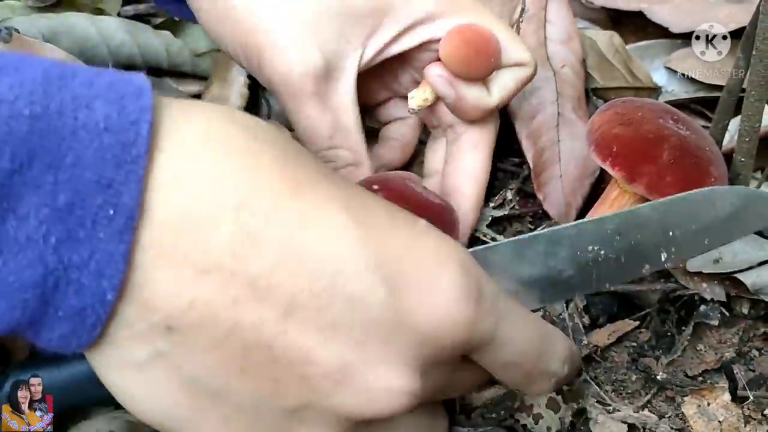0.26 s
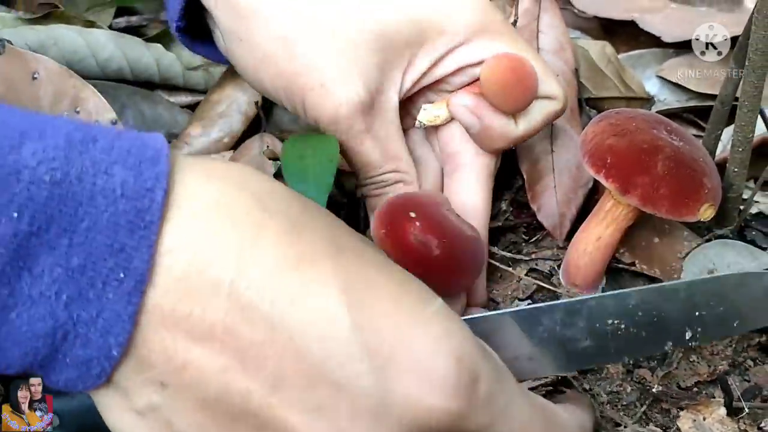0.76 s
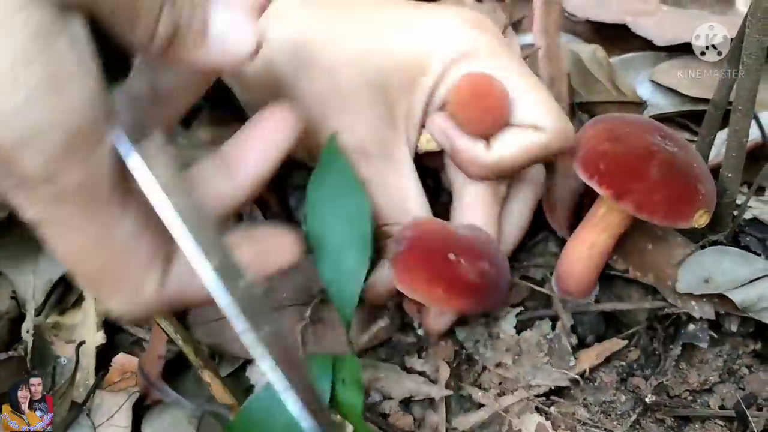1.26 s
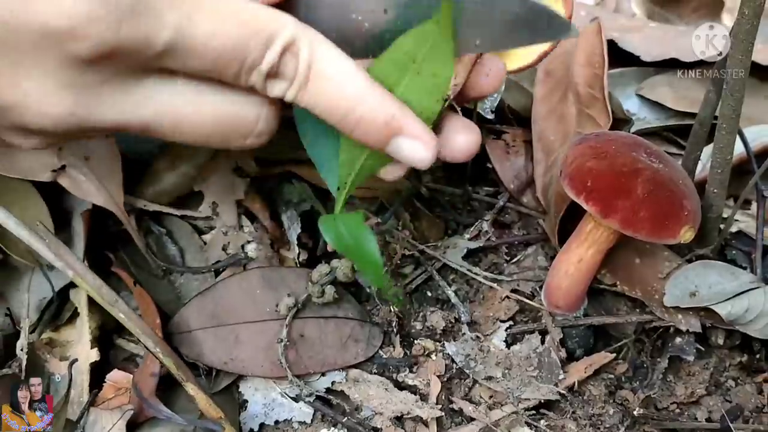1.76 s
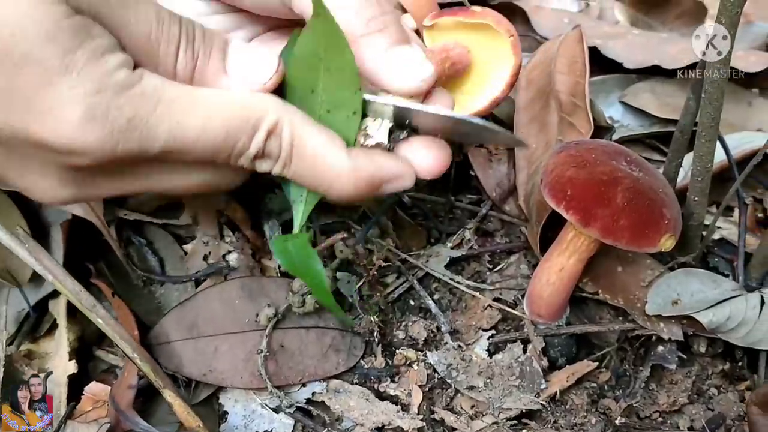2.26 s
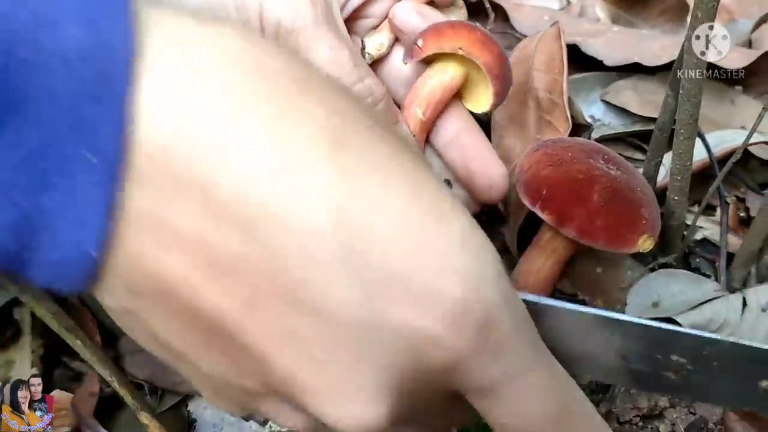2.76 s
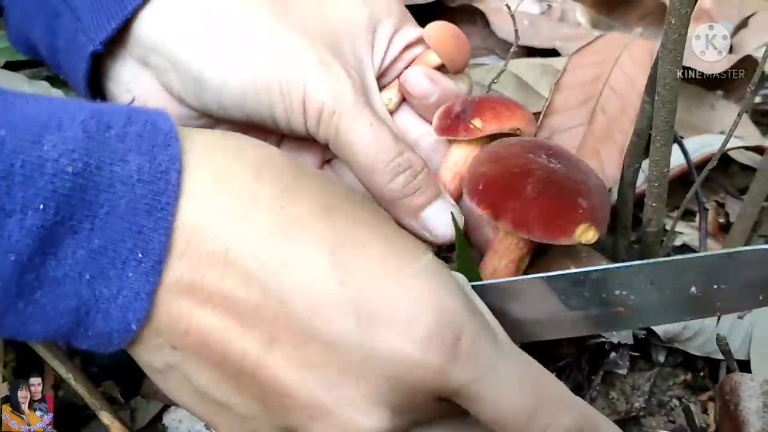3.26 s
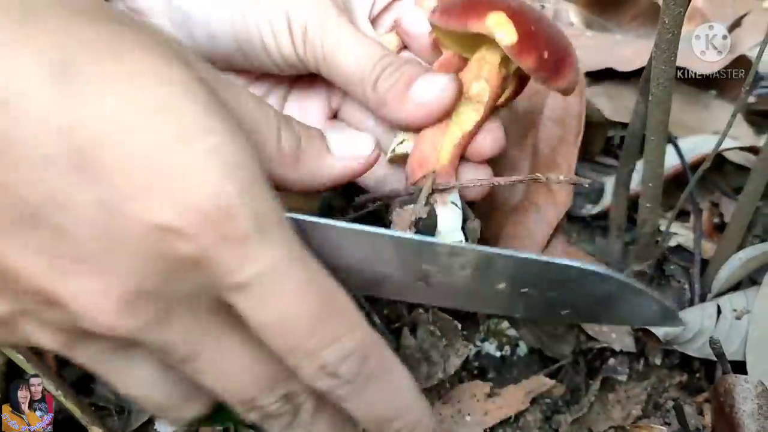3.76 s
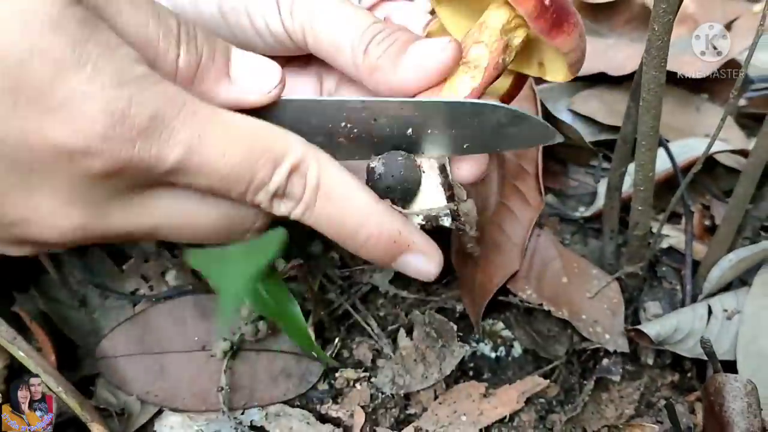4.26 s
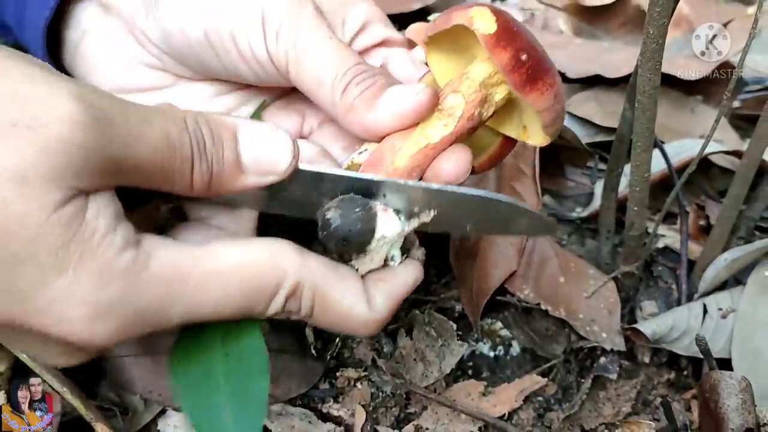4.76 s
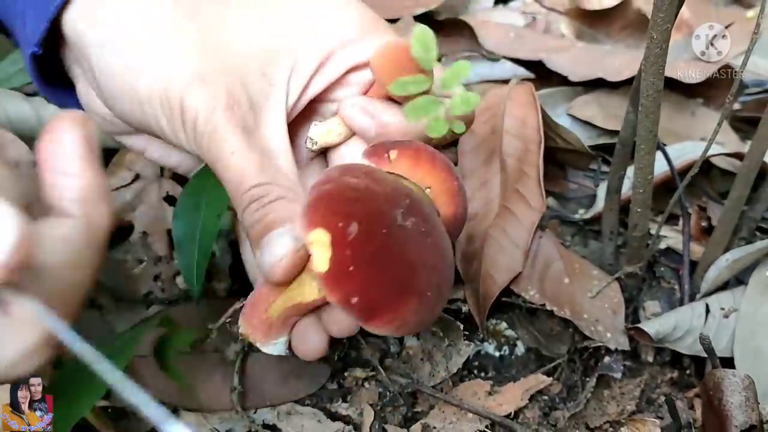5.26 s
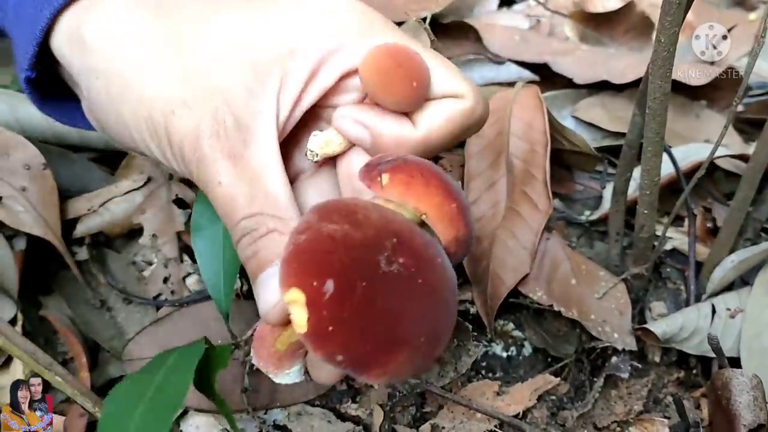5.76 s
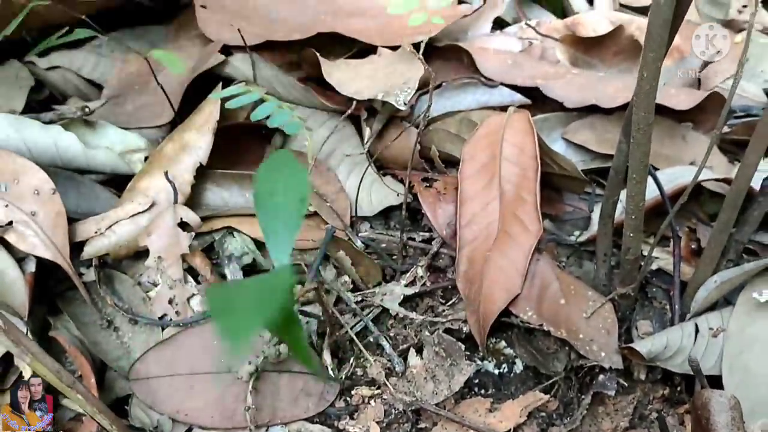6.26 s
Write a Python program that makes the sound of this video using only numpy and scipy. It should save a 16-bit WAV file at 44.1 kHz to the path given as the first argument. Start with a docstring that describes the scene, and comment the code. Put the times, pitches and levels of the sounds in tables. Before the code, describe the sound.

Close, crackly leaf-litter rustling and brittle snaps as mushrooms are picked and trimmed, with quiet woodland hiss and a short bird whistle behind.

```python
"""On a forest floor, microphones close to the ground: hands pick mushrooms from dry leaf litter, a knife scrapes stems.
Leaves and grit crackle as bands of noise struck by countless random grains, over soft rubbing.
Leaf ribs and twigs snap as short runs of fractures; twice a flicked leaf rings with damped sine modes.
A bird whistles one phrase on the right and others call farther off, all gliding sines with scattered echoes.
Filtered noise makes the hiss of insects in the trees and the far sounds of the wood."""
import sys
import numpy as np
from scipy import signal
from scipy.io import wavfile

SR = 44100
rng = np.random.default_rng(int(sys.argv[2]) if len(sys.argv) > 2 else 0)


def int16_out(signal):
    """Quantize to a 16-bit WAV file."""
    q = np.round(np.clip(np.atleast_2d(signal).T, -1, 1) * 32767)
    wavfile.write(sys.argv[1], SR, q.astype(np.int16))


N = 286650
TIME = np.arange(N) / SR


def from_db(db):
    """Decibels to gain."""
    return 10 ** (np.asarray(db) / 20)


def rms_one(x):
    """Scale to an rms of 1."""
    return x / np.sqrt(np.mean(x ** 2) + 1e-20)


def at_hz(points, hz):
    """Read a table on a log-frequency axis."""
    freq, value = np.transpose(points)
    return np.interp(np.log(hz), np.log(freq), value)


def band(x, low_hz, high_hz, order=2):
    """Causal band-pass."""
    edges = [low_hz, min(high_hz, .45 * SR)]
    return signal.sosfilt(signal.butter(order, edges, "band", fs=SR, output="sos"), x + 1e-18)


def ring(x, hz, width_hz):
    """One resonance, gain 1 on top."""
    r = np.exp(-np.pi * width_hz / SR)
    feedback = [1, -2 * r * np.cos(2 * np.pi * hz / SR), r * r]
    return signal.lfilter((1 - r * r) / 2 * np.array([1, 0, -1]), feedback, x + 1e-18)


def drift(rate):
    """Straight lines between random values of spread 1, that many values a second."""
    return np.interp(TIME * rate, np.arange(4096), rng.standard_normal(4096))


def pair(size, likeness):
    """Left and right white noise with a given likeness (correlation)."""
    mid, side = rng.standard_normal((2, size))
    likeness = np.clip(likeness, -1, 1)
    return (np.sqrt(1 + likeness) * mid + np.sqrt(1 - likeness) * side * [[1], [-1]]) / np.sqrt(2)


def pan(balance_db):
    """Left and right gains at constant power; a positive balance is louder on the left."""
    return rms_one(from_db([[balance_db / 2], [-balance_db / 2]]))


def scatter(x, t60, gap_s):
    """Dense reflections swell in and die, unrelated in the two channels, at the power of the source."""
    t = TIME[:SR]
    tail = rng.standard_normal((2, SR)) * from_db(-60 * t / t60) * (1 - np.exp(-t / gap_s))
    return signal.fftconvolve(x, rms_one(tail) / np.sqrt(SR), axes=1)[:, :N]


def lag_right(x, lag_s):
    """Sound from the hands reaches the left microphone first."""
    return np.stack([x[0], np.interp(TIME - lag_s, TIME, x[1])])


# colour of the far wood, relative: (frequency [Hz], density [dB per Hz])
FOREST_COLOUR = [(28, 10), (55, 4), (105, -6), (180, 4), (300, -13.5), (520, -14), (1300, -10), (2100, -2),
                 (3100, -6), (3700, -2), (5600, -6), (6800, -16), (8000, -20.5), (12000, -16), (15500, -45)]
# how alike the far wood is at both microphones: (frequency [Hz], left-right correlation)
FOREST_LIKENESS = [(50, 0.14), (130, 0.5), (600, 0.44), (1400, 0.0035), (3000, -0.16)]
FOREST_DB = -59


def forest(low_pan_db=0.0, high_pan_db=-5.0):
    """Low rumble of air and a wash of distant calls: bands of noise, each wavering by itself."""
    edges, out = np.geomspace(20, 16000, 23), 0
    patchy_db = 1.3
    balance = [(400, low_pan_db), (2400, high_pan_db), (5000, high_pan_db), (10000, low_pan_db)]
    for lo, hi in zip(edges, edges[1:]):
        hz = np.sqrt(lo * hi)
        waver_db = patchy_db * drift(4.0)
        gain = from_db(at_hz(FOREST_COLOUR, hz) + waver_db) * pan(at_hz(balance, hz))
        out = out + gain * band(pair(N, at_hz(FOREST_LIKENESS, hz)), lo, hi, order=3)
    return from_db(FOREST_DB) * rms_one(out)


INSECT_DB, INSECT_HZ, INSECT_WIDTH_HZ = -54, 4487, 740


def insects(side_db=-2.5, shimmer_db=1.0, shimmer_per_s=90):
    """Many far insects blend into one narrow, shimmering hiss of band-passed noise."""
    half_hz = INSECT_WIDTH_HZ / 2
    hiss = band(pair(N, 0), INSECT_HZ - half_hz, INSECT_HZ + half_hz, order=3)
    return from_db(INSECT_DB + shimmer_db * drift(shimmer_per_s)) * rms_one(hiss) * pan(side_db)


# soft body and fine fizz relative to the crackle, before hardness [dB]
BODY_DB, FIZZ_DB = -8.5, -17.5


def zone_gains(level_db, hard_db):
    """Gains of crackle, soft body and fizz for one contact; a harder one has less body and more fizz."""
    return from_db(level_db) * from_db([[0], [BODY_DB - hard_db / 2], [FIZZ_DB + hard_db]])


# the hands never rest entirely: (time [s], crackle level [dB])
FIDGET = [(0, -50), (1.6, -60.5), (2.1, -54.5), (2.8, -48.5), (3.6, -46), (4.15, -71), (4.28, -84),
          (4.65, -69), (4.8, -61), (5.8, -56), (6.2, -53.5), (6.5, -54)]
# fingertips only graze the litter, so their fidgeting is harder by this much [dB]
FIDGET_HARDNESS_DB = 4
# sweeps of hand and blade through the litter:
# (start [s], length [s], crackle level [dB], hardness [dB], release to 1/e [s])
SWEEPS = [(0.005, 0.027, -40.5, 8, 0.044), (0.208, 0.049, -46, 4, 0.032), (0.286, 0.038, -43, 8, 0.072),
          (0.409, 0.13, -45, 0, 0.03), (0.62, 0.14, -50, -2.5, .03), (0.808, 0.095, -45, 3.5, 0.032),
          (0.953, 0.032, -44.5, 0, .025), (1.035, 0.018, -34, 9, .075), (1.12, 0.055, -39.5, 4, 0.042),
          (1.258, 0.17, -47, -4, 0.043), (1.408, 0.099, -37.5, 6, 0.043), (1.512, 0.074, -40, 3, .045),
          (2.396, 0.12, -45, 7, .04), (2.47, 0.013, -37, -4, 0.048), (2.52, 0.22, -49, 3, 0.065),
          (2.76, 0.15, -49, 5, .05), (2.94, 0.055, -45, 9.5, 0.027), (3.108, 0.096, -44.5, 4, 0.032),
          (3.23, 0.057, -42, 2, 0.05), (3.48, 0.065, -45.5, 2, .04), (3.707, 0.26, -43, 2.5, 0.054),
          (3.842, 0.088, -42.5, 8.5, 0.031), (4.015, 0.077, -41, 3.5, 0.043), (5.154, 0.12, -43, 2.5, .05),
          (5.276, 0.058, -42, 0.5, 0.044), (5.382, 0.025, -33, 5.5, 0.018), (5.44, 0.11, -43.5, 6, 0.053),
          (5.571, 0.056, -40, 7, .016), (6.085, 0.022, -47.5, 12, 0.042)]
# light scrapes of the blade along a stem: (start [s], length [s], crackle level [dB])
SCRAPES = [(1.704, 0.056, -49), (1.837, 0.092, -51), (2.198, 0.11, -52.5), (4.334, 0.034, -50.5),
           (4.714, 0.0085, -50), (4.834, 0.04, -63), (4.961, 0.055, -55), (5.852, 0.0087, -61)]
SCRAPE_HARDNESS_DB, SCRAPE_RELEASE_S = 6, 0.054
# the swell is centred on the start; disturbed leaves settle from a lower level, in a multiple of the release
ATTACK_S, SETTLE_DB, SETTLE_RELEASES = 0.029, -5.5, 2.7


def handling():
    """Strokes swell, hold, let go and settle; their gains add in power over the fidgeting of the hands."""
    power = zone_gains(np.interp(TIME, *np.transpose(FIDGET)), FIDGET_HARDNESS_DB) ** 2
    scrapes = [(*row, SCRAPE_HARDNESS_DB, SCRAPE_RELEASE_S) for row in SCRAPES]
    for start, length, level_db, hard_db, release in SWEEPS + scrapes:
        swell = np.clip((TIME - start) / ATTACK_S + .5, 0, 1)
        after = np.maximum(TIME - start - length, 0)
        let_go = np.exp(-after / release)
        settle = from_db(SETTLE_DB) * np.exp(-after / (SETTLE_RELEASES * release))
        power += (zone_gains(level_db, hard_db) * swell * np.maximum(let_go, settle)) ** 2
    return np.sqrt(power)


# sound from the back of a leaf comes round its edge late and inverted:
# delay [s], swing of the delay (share), mean strength (share), random turns of the leaf [per s]
BACK_S, BACK_SWING, BACK_SHARE, TURNS_PER_S = .00066, .1, .42, 14


def both_faces(x):
    """Front and back of a leaf interfere; the hollows in its sound shift as the leaf turns."""
    late = TIME - BACK_S * (1 + BACK_SWING * drift(TURNS_PER_S))
    share = np.clip(BACK_SHARE * (1 + .5 * drift(TURNS_PER_S)), 0, 1)
    return x - share * np.stack([np.interp(late, TIME, channel) for channel in x])


# leaf or grit in the hands; broad leaves are darker and ring lower:
# (time [s], tilt of the crackle [dB per octave], resonance [Hz])
HANDLED = [(0, 0, 4370), (1.05, -4, 3440), (1.25, 0, 4080), (1.46, 2, 3560), (1.56, 0.5, 4000),
           (2.0, -1.5, 4260), (2.8, -3.5, 3260), (3.0, -2.5, 4050), (3.25, -1, 3600), (3.75, -2, 4000),
           (3.9, 2.5, 3800), (4.05, -2, 3100), (4.9, 2, 4000), (5.25, -4.5, 3330), (5.48, 1.5, 2450),
           (5.63, -4, 2880), (6.1, -5, 4200)]
# height [dB] and width [octaves] of that resonance
LEAF_PEAK_DB, LEAF_PEAK_OCTAVES = 1.5, 0.51
# colour of the litter, relative within each zone: (frequency [Hz], density [dB per Hz])
LITTER_COLOUR = [(90, -24), (190, -9.5), (380, -2.5), (520, -9), (750, -2), (1150, -1.5), (1480, -3.5),
                 (2100, -1), (2500, -1), (2950, -1.5), (3800, 2), (5500, 2.5), (6400, -4.5), (7500, -16.5),
                 (11000, -19.5), (15000, -25)]
# balance of the rustle: (frequency [Hz], left-right level [dB])
LITTER_PAN = [(200, 5), (400, 2.5), (800, -0.5), (2400, 0), (4400, -3), (8000, -1), (14000, 0.5)]
# the bass of the rustle is most alike at both microphones: (frequency [Hz], left-right correlation)
LITTER_LIKENESS = [(500, 0.71), (1150, 0.3), (3300, 0.18), (10000, 0.11)]
# fractures at rms handling [per s], spread of their sizes [dB], rubbing against grains of rms 1,
# change of colour from leaf to leaf [dB]
GRAINS_PER_S, GRAIN_SIZE_DB, RUB, PATCHY_DB = 1700, 2.7, .55, 3.8


def rustle(crackle, body, fizz, clump_db=1.0, clumps_per_s=150, patches_per_s=80):
    """Tiny fractures clump over a smooth rubbing; firmer handling breaks more, and colour shifts by leaf."""
    s, tilts, resonances = np.transpose(HANDLED)
    tilt, leaf_hz = np.interp(TIME, s, tilts), np.interp(TIME, s, resonances)
    density = GRAINS_PER_S * np.sqrt(rms_one(crackle))
    born = rng.random(N) < density / SR
    sizes = from_db(GRAIN_SIZE_DB * np.minimum(rng.exponential(1, N), 4))
    fractures = rms_one(born * sizes / np.sqrt(density))
    grains = (fractures + RUB) * from_db(clump_db * drift(clumps_per_s))
    out = np.zeros((2, N))
    # (low [Hz], high [Hz], bands, gain, tilt [dB per octave], heard from both faces of the leaf)
    zones = [(80, 1600, 9, body, 0, False),
             (1600, 7000, 12, crackle, tilt, True),
             (7000, 15700, 6, fizz, 0, True)]
    for low, high, count, gain, slope, two_faced in zones:
        edges, centre = np.geomspace(low, high, count + 1), np.sqrt(low * high)
        # neighbouring bands are struck unalike
        strikes = [grains * pair(N, at_hz(LITTER_LIKENESS, centre)) for _ in range(2)]
        zone = 0
        for k, (lo, hi) in enumerate(zip(edges, edges[1:])):
            hz = np.sqrt(lo * hi)
            colour_db = at_hz(LITTER_COLOUR, hz) + slope * np.log2(hz / centre)
            colour_db = colour_db + PATCHY_DB * drift(patches_per_s)
            colour_db += LEAF_PEAK_DB * np.exp(-(np.log2(hz / leaf_hz) / LEAF_PEAK_OCTAVES) ** 2)
            struck = band(strikes[k % 2], lo, hi)
            zone = zone + struck * from_db(colour_db) * pan(at_hz(LITTER_PAN, hz))
        out += gain * rms_one(both_faces(zone) if two_faced else zone)
    return out


# loud snaps of leaf ribs and twigs, and at 2.884 s a faint echo of the snap just before it; # the level is the
# rms over 10 ms from which each part is set: # (time [s], level [dB], resonance [Hz], decay to 1/e [s], body
# [dB re level], fizz [dB re level], # left-right level [dB])
SNAPS = [(.0099, -38, 4840, 0.0019, -34, -22, -0.5), (.2494, -38.5, 4700, 0.0013, -18, -13, -0.5),
         (.284, -44, 4200, 0.00091, -8, -2, 0.5), (.2895, -37, 4200, 0.0035, -8, -14, -3),
         (.3675, -33, 3500, 0.0017, -19, -17, 0.5), (.374, -32.5, 3630, 0.0021, -8.5, -12, -2),
         (.4429, -29, 4040, 0.0007, -26, -16, 2.5), (.4601, -30.5, 3700, 0.00046, -14, -20, -1.5),
         (.463, -35.5, 3500, 0.0028, -7, -14, -0.5), (.614, -44.5, 4130, 0.00089, 1.5, -10, -3),
         (.6595, -35.5, 4640, 0.0021, -7.5, -20, -3.5), (.706, -48, 5470, 0.00064, -10, -10, -2),
         (.7371, -32.5, 4150, 0.0018, -11, -19, -2), (.79, -30.5, 3980, 0.0019, -24, -31, -4),
         (.846, -34, 3340, 0.0058, -15.5, -9, -5), (.858, -38, 3320, 0.0022, -22, -19, 3),
         (.8927, -28.5, 3950, .0012, -29, -25, -2.5), (.959, -35.5, 4250, .003, -6.5, -19, -1),
         (.975, -39.5, 4070, 0.0021, -31, -13, -0.5), (1.0045, -36.5, 3660, 0.0013, -27, -7, -1),
         (1.013, -35, 3730, 0.0019, -20, -24, -2), (1.0325, -26.5, 3300, 0.00044, -7, -8, -0.5),
         (1.0415, -35, 4500, .0015, -26, -10, -0.5), (1.051, -41, 3700, 0.0012, -26, -13, 2),
         (1.055, -47, 3900, .0006, -22, -5, -1), (1.0655, -44, 3560, 0.0027, -24, -20, -9),
         (1.128, -39, 3900, 0.0015, -17, -20, -3), (1.1567, -34, 4830, 0.0019, -14, -8.5, 0),
         (1.166, -45, 3600, 0.0011, -5, -11, -3), (1.26, -37, 4930, 0.0036, -18, -20, -1),
         (1.279, -44.5, 3930, .0025, 1, -20, -0.5), (1.399, -35, 4460, 0.0026, -24, -18, -4.5),
         (1.356, -32.5, 5140, 0.014, -16, -19, -1), (1.4112, -29, 2500, 0.0012, -9.5, -16, -3.5),
         (1.4211, -26.5, 4100, 0.0015, -11.5, -20, -4.5), (1.438, -39, 4200, .001, -27, -16, -5.5),
         (1.4425, -37, 3500, 0.0017, -18, -20, -1.5), (1.459, -34, 2600, 0.0015, -23, -20, 0),
         (1.463, -30.5, 3670, 0.0018, -17, -21, -2), (1.4765, -38.5, 3700, .0016, -12, -27, -5.5),
         (1.4735, -33.5, 2400, 0.0051, -23, -14, -4.5), (1.487, -32, 3740, .0022, -15, -26, -2),
         (1.5215, -40, 5260, 0.0014, -6, -22, -4), (1.557, -32, 4150, .003, -18, -27, -0.5),
         (1.566, -36, 4400, 0.0012, -17, -26, -2.5), (1.574, -37, 5200, 0.00082, -13, -22, -1.5),
         (1.592, -32.5, 4000, 0.00061, -8, -16, 2.5), (1.6026, -26.5, 4130, 0.0011, -9.5, -13, -1),
         (1.6665, -34, 4600, .0016, -14.5, -13.5, -1), (1.9214, -39.5, 5500, 0.0018, -22, -29, 0),
         (1.997, -34.5, 4170, 0.00062, -23, -17.5, -4.5), (2.0415, -34, 3800, 0.002, -15, -18, -1),
         (2.197, -33, 4100, 0.00089, -35, -15, -5.5), (2.2025, -33, 4500, 0.002, -12, -14, -3.5),
         (2.3038, -35, 4340, 0.00087, -17, -9, 1), (2.3383, -42, 4630, 0.00064, -41, -14, -3),
         (2.3987, -35, 5800, .0033, -39, -22, -1.5), (2.4665, -17.5, 3770, 0.002, -17, -14.5, -1.5),
         (2.4705, -27.5, 3870, 0.0083, -13, -30, -2), (2.4775, -19.5, 5440, 0.0056, -23, -30, -1.5),
         (2.486, -23.5, 3900, 0.0031, -26, -27, 1), (2.8703, -25, 5170, 0.00051, -16, -39, -4.5),
         (2.884, -55, 5540, .0012, -12, -10, 3), (2.945, -52, 4760, 0.0012, -26, -13, -5),
         (2.987, -43.5, 4600, 0.0019, -23, -16, -4), (3.106, -28, 5020, 0.00077, -44, -20, -2.5),
         (3.2066, -34, 3800, 0.0015, -10.5, -34, -4), (3.2325, -37, 3870, 0.0011, -15, -22, -3),
         (3.278, -34, 4240, 0.0031, -22, -27, -2.5), (3.2915, -38, 3520, 0.0014, -12, -30, -1.5),
         (3.37, -43, 4200, .001, -20, -28, -1.5), (3.411, -43.5, 2770, 0.0012, 1, -31, 0.5),
         (3.4779, -35.5, 3720, 0.0027, -8.5, -38, -3.5), (3.4888, -30.5, 3160, 0.00096, -12, -30, -5),
         (3.5193, -20, 3750, 0.0017, -16, -21, -2.5), (3.545, -32.5, 3760, 0.0015, -23, -15, 1.5),
         (3.6159, -35, 5000, 0.0011, -28, -23, -6), (3.6944, -37, 4080, 0.001, -21, -30, -3),
         (3.849, -46.5, 3930, 0.0049, 8, -9, -3.5), (3.9058, -32.5, 4200, 0.0013, -10, -16, -1),
         (3.9105, -40, 4160, .0008, -16, -18, -1), (3.942, -37, 3550, 0.0024, -10, -26, 0),
         (4.049, -42.5, 4100, 0.0014, -11, -7, -4.5), (4.109, -52, 3600, .0008, -3, -19, -4),
         (4.1136, -41, 5440, 0.00077, -12, -16, 0), (4.365, -43, 4470, 0.0029, -7, -39, 3),
         (4.8891, -42.5, 3900, 0.003, -18, -20, 2), (4.9756, -39, 3800, 0.0026, -23, -15, -2),
         (5.1159, -40.5, 4360, 0.00058, -16, -15, -1.5), (5.2235, -36.5, 4040, 0.0021, -22, -11.5, -5),
         (5.286, -39.5, 3970, .005, -16, -13, -5), (5.2969, -39, 3680, 0.0023, 0, -12, -3),
         (5.406, -27, 3380, 0.0016, -22.5, -34, -8), (5.415, -36, 2820, 0.0041, -15, -23, -2.5),
         (5.4472, -36, 2600, 0.0034, -12, -7, -4.5), (5.493, -41, 2680, 0.0016, -9, -13, -3),
         (5.575, -24.5, 5930, 0.0017, -14, -13.5, -2), (5.5793, -24.5, 2150, 0.0028, -15.5, -17, -2),
         (5.61, -37, 3780, 0.0014, -23, -23, 0.5), (5.635, -42, 3970, 0.0022, -26, -21, -1.5),
         (5.6774, -39, 3300, 0.0005, -31, -31, -2.5), (5.6795, -42.5, 2340, 0.0008, -30, -33, -9),
         (5.6948, -29, 2800, 0.00061, -16, -44, -2.5), (5.854, -42.5, 5450, 0.0017, -20, -14, -2.5)]
# the crack spreads below and above the resonance of the broken piece (frequency ratios)
CRACK_BELOW, CRACK_ABOVE = 0.52, 1.415
# bands of a snap's body and fizz: (low [Hz], high [Hz])
BODY_HZ, FIZZ_HZ = (362, 1580), (5600, 12950)
# the soft ground takes the push of each snap: band (low [Hz], high [Hz]), level [dB re body]
THUD_HZ, THUD_DB = (84, 327), -13
# the farther right a snap lies, the sooner it reaches the right microphone;
# at the middle balance it has no lag within the snap layer
SNAP_LAG_S_PER_DB, SNAP_MIDDLE_DB = .00006, -3


def snaps(rows, likeness=0.43, crack_db=-7.5, ring_db=-10.0, ring_width_hz=430, body_pan_db=4.0,
          fizz_pan_db=-1.0, ragged_db=4.0, body_likeness=0.94, break_db=9.5):
    """A run of fractures swells to one clean break and dies away; the broken piece rings briefly."""
    size, lead = 2048, 256
    t, out = TIME[:size] - lead / SR, np.zeros((2, N + 2 * size))
    ten_ms = SR / 100
    clean_break = from_db(break_db) * signal.unit_impulse(size, lead)
    for s, level_db, hz, decay, body_rel, fizz_rel, side_db in rows:
        swell = np.exp(-np.abs(t) / decay)
        fractures = swell * from_db(ragged_db * rng.standard_normal(size))
        run = clean_break + fractures * pair(size, likeness)
        push = clean_break + fractures * pair(size, body_likeness)
        lag = round(SR * SNAP_LAG_S_PER_DB * (side_db - SNAP_MIDDLE_DB))
        run[1], push[1] = np.roll(run[1], lag), np.roll(push[1], lag)
        crack = band(run, CRACK_BELOW * hz, CRACK_ABOVE * hz, order=3)
        fine = band(fractures * pair(size, likeness), *FIZZ_HZ, order=3)
        # (sound, level [dB], shift of the balance [dB])
        parts = [(crack, crack_db, 0),
                 (ring(crack, hz, ring_width_hz), ring_db, 0),
                 (band(push, *BODY_HZ), body_rel, body_pan_db),
                 (band(push, *THUD_HZ), body_rel + THUD_DB, body_pan_db),
                 (fine, fizz_rel, fizz_pan_db)]
        start = round(s * SR)
        for part, part_db, shift_db in parts:
            even = part * np.sqrt(ten_ms / np.sum(part ** 2, axis=1, keepdims=True))
            out[:, start:start + size] += even * from_db(level_db + part_db) * pan(side_db + shift_db)
    return out[:, lead:lead + N]


# random ticks of grit: rate [per s], level [dB re crackle], spread [dB]
TICKS_PER_S, TICK_DB, TICK_SPREAD_DB = 16, -4.5, 2.2
# middle resonance, and the remaining columns of a snap
TICK_HZ, TICK_DECAY_S, TICK_BODY_DB, TICK_FIZZ_DB, TICK_PAN_DB = 4200, 0.00093, -24, -28, 0.5


def grit_ticks(crackle):
    """Crumbs of grit give small snaps at random, their level following the handling of the moment."""
    slot_s = .02
    slots = np.arange(0, N / SR, slot_s)
    chance, late = rng.random((2, len(slots)))
    size, pitch = rng.standard_normal((2, len(slots)))
    s = slots + late * slot_s
    level_db = 20 * np.log10(np.interp(s, TIME, crackle)) + TICK_DB + TICK_SPREAD_DB * size
    hz = TICK_HZ * 2 ** (.2 * pitch)
    shape = (TICK_DECAY_S, TICK_BODY_DB, TICK_FIZZ_DB, TICK_PAN_DB)
    return [(s[k], level_db[k], hz[k], *shape) for k in np.flatnonzero(chance < TICKS_PER_S * slot_s)]


def whistle(notes, waver, flutter_db):
    """Nearly pure gliding notes with an unsteady pitch and strength."""
    voice = np.zeros(N)
    unsteady, flutter = 1 + waver * drift(500), from_db(flutter_db * drift(260))
    for note in notes:
        s, hz, level = np.transpose(note)
        span = slice(round(s[0] * SR), round(s[-1] * SR))
        phase = 2 * np.pi * np.cumsum(np.interp(TIME[span], s, hz) * unsteady[span]) / SR
        soft_ends = signal.windows.tukey(len(phase), .1)
        strength = from_db(np.interp(TIME[span], s, level))
        voice[span] += np.sqrt(2) * np.sin(phase) * soft_ends * strength
    return np.stack([voice * flutter] * 2)


# pitch halfway [Hz], fall [Hz per s], half the length [s], level towards the ends [dB re halfway]
CHIP_HZ, CHIP_FALL_HZ_PER_S, CHIP_HALF_S, CHIP_EDGE_DB = 1973, 29000, 0.0062, 9


def chip(s, level_db):
    """One short note falls in pitch while its level dips halfway."""
    fall_hz, edge_db = CHIP_FALL_HZ_PER_S * CHIP_HALF_S, level_db + CHIP_EDGE_DB
    return [(s - CHIP_HALF_S, CHIP_HZ + fall_hz, edge_db),
            (s, CHIP_HZ, level_db),
            (s + CHIP_HALF_S, CHIP_HZ - fall_hz, edge_db)]


# the near bird's phrase, one list a note: (time [s], pitch [Hz], level [dB])
SONG = [
    [(2.364, 1867, -57), (2.378, 1995, -44), (2.41, 2020, -42.5), (2.455, 2030, -42), (2.48, 2030, -43)],
    [(2.402, 2420, -61), (2.418, 2560, -45.5), (2.445, 2760, -39), (2.468, 2810, -48)],
    [(2.558, 3494, -51), (2.568, 3392, -40.5), (2.588, 3347, -34), (2.6, 3123, -39), (2.61, 2904, -39.5),
     (2.622, 2966, -41), (2.635, 3550, -39), (2.65, 3950, -41), (2.662, 3820, -35), (2.676, 3420, -43.5),
     (2.694, 3350, -50)],
    [(2.685, 2480, -57), (2.712, 2520, -45.5), (2.738, 2550, -51), (2.746, 2600, -59)],
]
# falling chips of a far bird: (time halfway [s], level halfway [dB])
CHIPS = [(4.576, -61), (4.618, -60), (4.716, -57.5), (5.98, -60)]
# a far upward slur: (time [s], pitch [Hz], level [dB])
FAR_SLUR = [(5.045, 2150, -58), (5.07, 2280, -55), (5.095, 2600, -55), (5.115, 3080, -52),
            (5.145, 2980, -53), (5.18, 3000, -54), (5.2, 2950, -59)]
# the wood holds each call briefly: level [dB], decay [s]
WOOD_DB, WOOD_T60_S = -3.5, .55


def birds(side_db=-14.0, trunks_db=-3.0, far_side_db=-5.0):
    """Only the near bird is heard directly; near and far calls scatter off the trunks and linger in the wood."""
    near = whistle(SONG, waver=0.012, flutter_db=1.8)
    far = whistle([FAR_SLUR] + [chip(*row) for row in CHIPS], waver=0.06, flutter_db=3)
    trunks = scatter(from_db(trunks_db) * near + far, t60=0.05, gap_s=0.00042)
    wood = from_db(WOOD_DB) * scatter(near + far, WOOD_T60_S, gap_s=0.098)
    return near * pan(side_db) + (trunks + wood) * pan(far_side_db)


# a broad dry leaf is flicked: (time [s], level [dB])
LEAF_FLICKS = [(5.406, -43), (5.578, -34)]
# modes of the ringing leaf: (frequency [Hz], level [dB re flick], t60 [s])
LEAF_MODES = [(1760, 8, 0.054), (2070, -4, 0.047), (2250, -24, 0.11)]
# the flicked leaf lies to the right: left-right level [dB]
LEAF_PAN_DB = -7.5


def flicked_leaf():
    """A stiff, curled leaf springs back and rings with a hollow note: a sum of damped sine modes."""
    out = np.zeros(N)
    for s, flick_db in LEAF_FLICKS:
        age = TIME[:N - round(s * SR)]
        for hz, mode_db, t60 in LEAF_MODES:
            decay_db = -60 * np.minimum(age / t60, 2)
            out[N - len(age):] += from_db(flick_db + mode_db + decay_db) * np.sin(2 * np.pi * hz * age)
    return out * pan(LEAF_PAN_DB)


def scene(ground_db=-10.0, ground_t60=0.054):
    """The handling is near the microphones; ground and hands throw the snaps back briefly; the wood is around."""
    wood = birds() + insects() + forest()
    crackle, body, fizz = handling()
    leaves = rustle(crackle, body, fizz) + flicked_leaf()
    cracks = snaps(SNAPS + grit_ticks(crackle))
    thrown_back = from_db(ground_db) * scatter(cracks, ground_t60, gap_s=0.0013)
    return lag_right(leaves + cracks + thrown_back, lag_s=0.0003077) + wood


CUTOFF_HZ = 15700


def record(dry):
    """A steep low-pass cuts the top."""
    return signal.sosfilt(signal.ellip(10, .2, 80, CUTOFF_HZ, fs=SR, output="sos"), dry)


dry = scene()
out = record(dry)
int16_out(out)
```